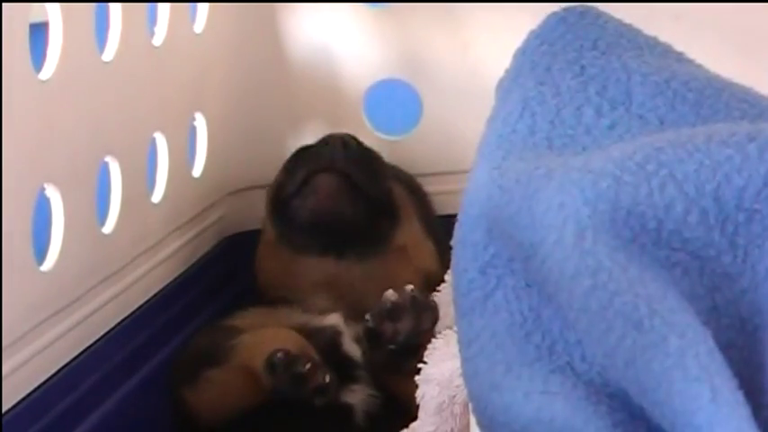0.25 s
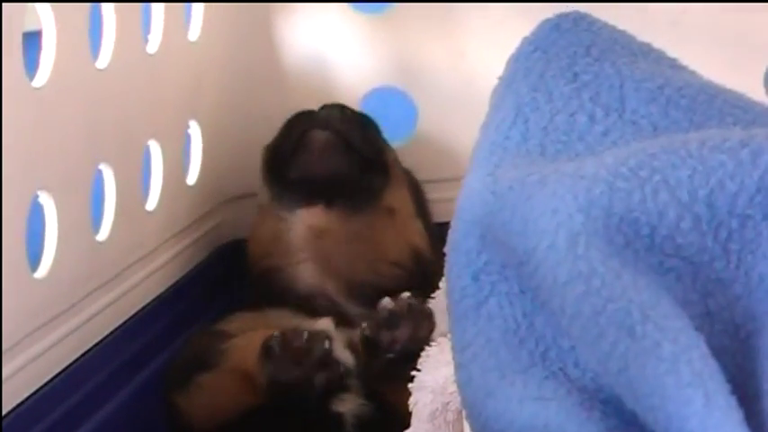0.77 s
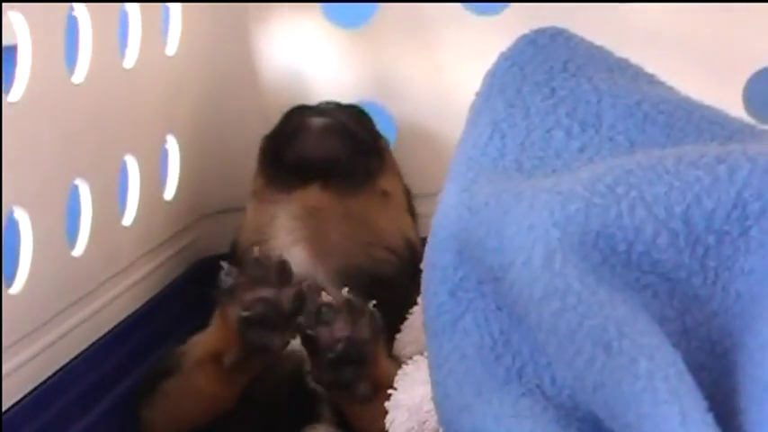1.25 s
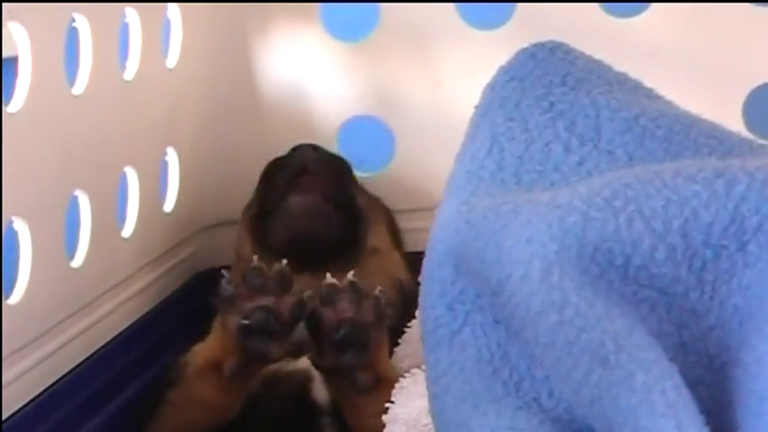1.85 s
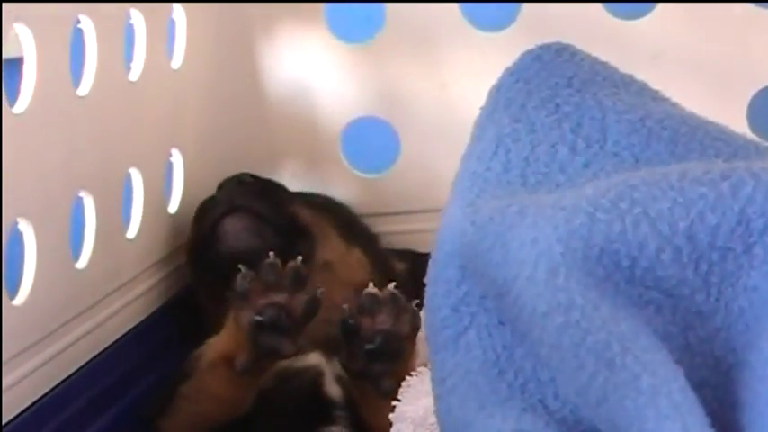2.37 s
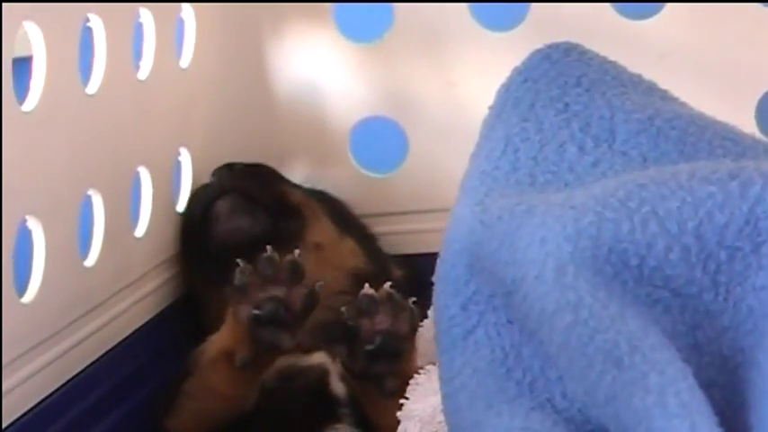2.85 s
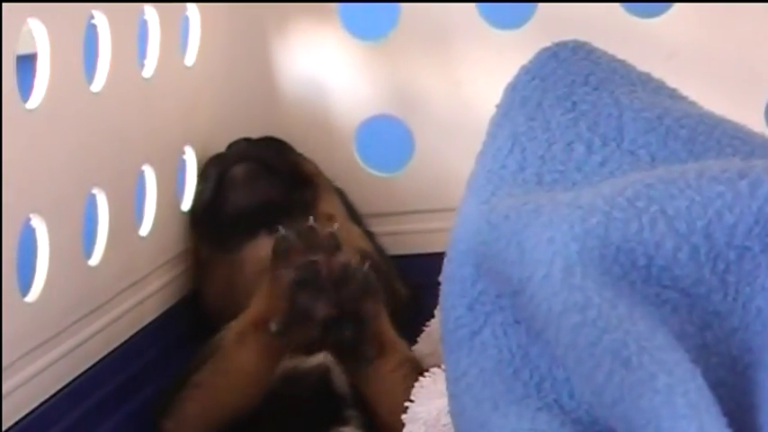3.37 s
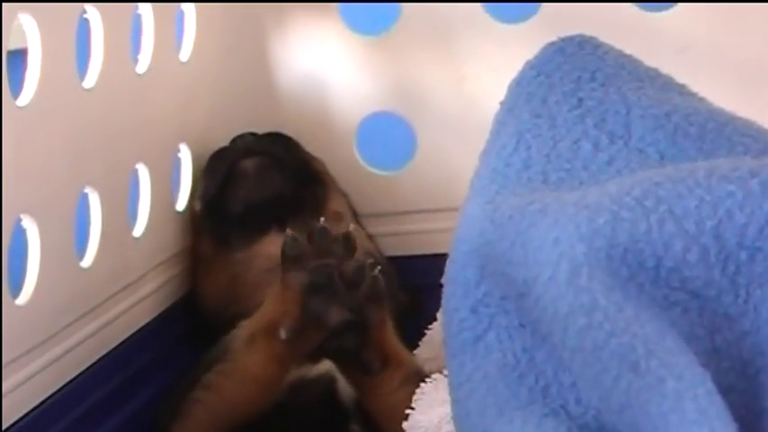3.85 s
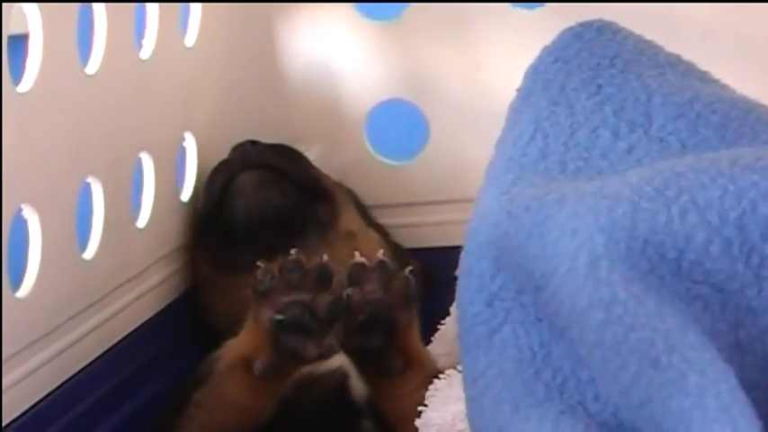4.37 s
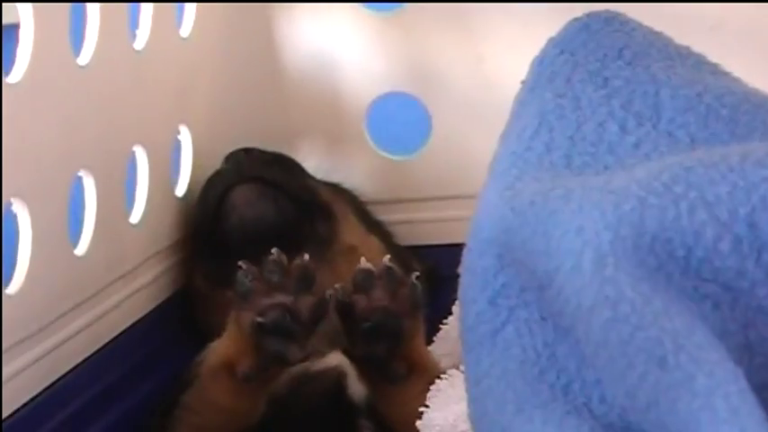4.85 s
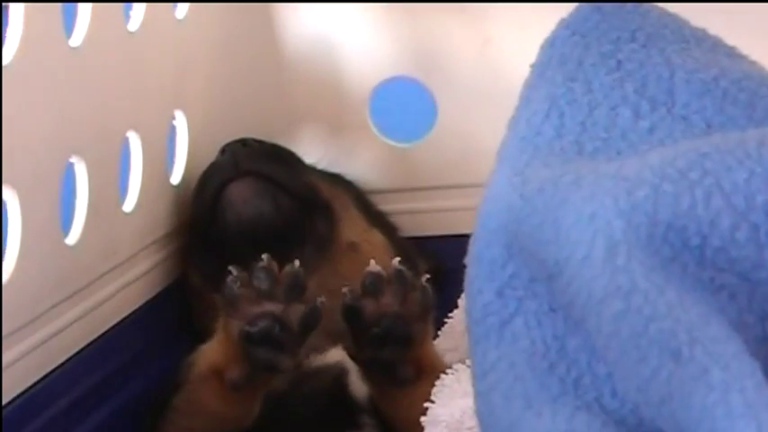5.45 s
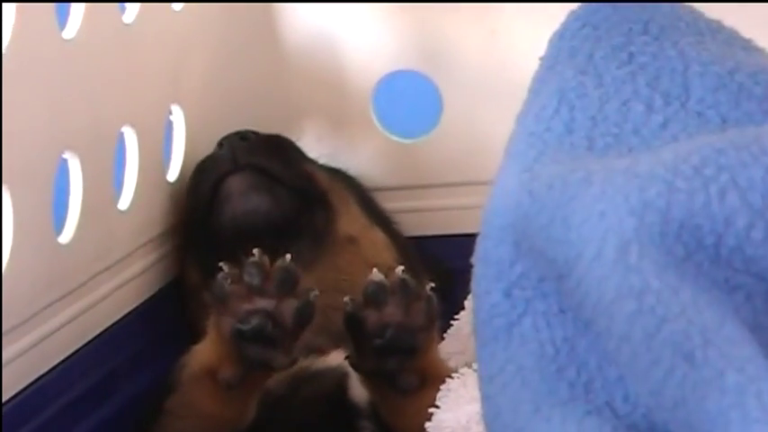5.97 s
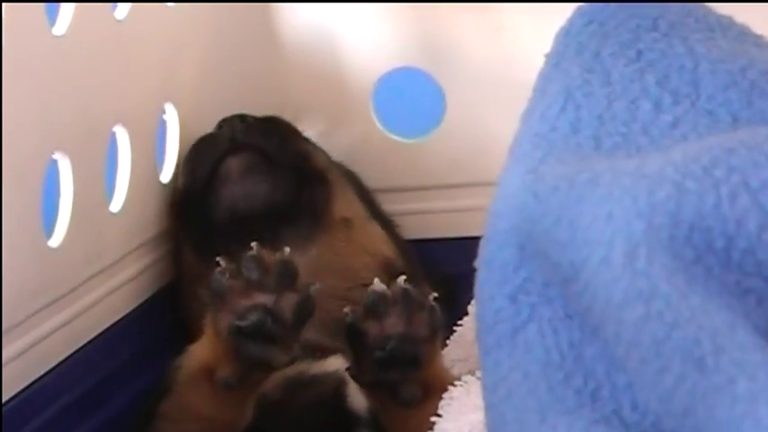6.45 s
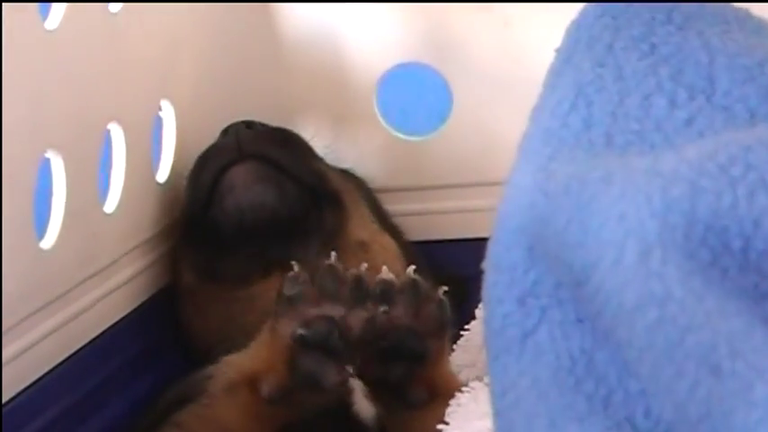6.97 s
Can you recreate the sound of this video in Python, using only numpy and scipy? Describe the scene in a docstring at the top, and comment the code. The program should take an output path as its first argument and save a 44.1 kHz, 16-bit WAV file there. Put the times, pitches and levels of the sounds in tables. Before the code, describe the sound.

Close, nasal puppy cries creak open, rise into high wavering whines and sink, shortening to quick yelps over faint room hum and hiss.

```python
"""In a quiet room, a very young puppy cries in its sleep in a plastic laundry basket, close to a camera.
Its cries start with a creak, and most rise to a thin whine and sink again; a high nasal ring rides along.
The voice is a stack of overtones shaped by throat, muzzle and nose, with rough noise mixed in.
Lips tick and fur brushes the bedding (short bursts of noise); an appliance hums (steady tones)
behind the camera's own faint whistle and a bed of room noise."""
import sys
import numpy as np
from scipy import signal
from scipy.fft import rfft, irfft, next_fast_len
from scipy.io import wavfile
from scipy.ndimage import uniform_filter1d, map_coordinates

SR = 44100
rng = np.random.default_rng(int(sys.argv[2]) if len(sys.argv) > 2 else 0)


def generate_wav(signal):
    """Clip the signal to [-1, 1] and save it as 16-bit WAV at the path in sys.argv[1]."""
    frames = np.transpose(np.atleast_2d(signal))
    scaled = np.clip(frames, -1, 1) * 32767
    pcm = np.round(scaled).astype(np.int16)
    wavfile.write(sys.argv[1], SR, pcm)


N = 317520

# colour given by throat, muzzle and basket: (frequency [Hz], level [dB])
THROAT = [(350, -20), (900, 2), (1250, 0), (1850, 0), (2150, -19), (2400, -26), (2560, -30.5),
          (3050, -24.5), (3900, -36.5), (4650, -36.5), (5700, -54), (7050, -23), (7950, -25.5), (9300, -62),
          (11000, -48), (14000, -82.5)]
# colour of air leaving the nose: (frequency [Hz], relative level [dB per Hz])
NOSE_AIR = [(5000, -41.5), (6200, -16.5), (7100, 8.5), (8000, -3.5), (9400, -27), (11000, -11.5),
            (11900, -9.5), (13000, -28), (15500, -38)]
NASAL_HZ = 5600  # overtones above this leave through the nose
TOP_HZ = 15700  # upper limit of the sound


def puppy():
    """The cries, one after another, and the small noises of mouth and nose."""
    # pitch of the vocal folds, one curve per cry: (time [s], pitch [Hz])
    pitch_curves = [
        [(0.07, 358.7), (0.108, 500), (0.2, 678.4), (0.226, 613), (0.24, 702), (0.254, 997)],
        [(0.392, 422.6), (0.404, 513.6), (0.416, 572), (0.424, 628), (0.436, 658), (0.46, 877), (0.506, 1014),
         (0.586, 1172), (0.644, 1254), (0.88, 1302), (1.03, 1351), (1.304, 1224), (1.69, 1140), (1.808, 1186),
         (1.832, 1167), (1.855, 1230)],
        [(2.575, 585), (2.585, 604), (2.625, 841.3), (2.685, 877.6), (2.735, 1015), (2.9, 1081), (3.115, 1108),
         (3.19, 1177), (3.35, 1229), (3.45, 1209), (3.7, 1188), (3.82, 1092), (3.882, 948), (3.93, 708),
         (4.02, 465.2), (4.049, 379)],
        [(4.893, 388.5), (4.94, 688.5), (5.035, 768), (5.088, 820), (5.138, 785.5), (5.161, 683),
         (5.245, 705.6), (5.326, 515)],
        [(5.588, 898), (5.65, 1047), (5.674, 910.4), (5.714, 1072), (5.758, 915), (5.81, 1017), (5.852, 933.5),
         (5.906, 908.6), (5.976, 819)],
        [(6.156, 666), (6.168, 653), (6.244, 943), (6.28, 909), (6.358, 1078), (6.496, 1163), (6.602, 1066),
         (6.654, 941.5), (6.698, 652.4), (6.768, 501), (6.786, 368)],
    ]
    # loudness, one curve per cry: (time [s], level of the voice [dB], level of its nasal ring [dB])
    loudness_curves = [
        [(0.07, -35, -68), (0.08, -31, -58), (0.1, -31, -56.5), (0.228, -28, -54.5), (0.254, -29.5, -84)],
        [(0.392, -25, -61), (0.4, -30.5, -58.5), (0.432, -26.5, -49), (0.496, -19.5, -48),
         (0.506, -19.5, -52.5), (0.578, -24.5, -46), (0.7, -18, -49.5), (0.798, -18, -47), (1.026, -8.5, -41.5),
         (1.124, -11, -42.5), (1.292, -8, -51), (1.316, -13, -51), (1.426, -14.5, -51.5), (1.454, -13.5, -55.5),
         (1.65, -21, -58.5), (1.76, -23, -63), (1.816, -24, -50.5), (1.855, -37.5, -66)],
        [(2.575, -27.5, -47), (2.591, -24.5, -40.5), (2.627, -17, -42), (2.841, -19.5, -41.5),
         (2.887, -19, -41), (3.067, -15.5, -45), (3.153, -16, -45), (3.433, -16, -34.5), (3.711, -13, -37.5),
         (3.757, -15.5, -40), (3.781, -12, -40.5), (3.823, -11.5, -49), (3.851, -13.5, -44), (3.995, -21, -48),
         (4.049, -30.5, -59)],
        [(4.893, -38.5, -53), (4.925, -32.5, -52), (5.093, -22, -45.5), (5.195, -26, -47), (5.261, -28, -52),
         (5.277, -25.5, -44), (5.315, -29, -53), (5.326, -43, -63)],
        [(5.588, -32, -51), (5.6, -27.5, -55.5), (5.636, -25.5, -43.5), (5.68, -20, -44), (5.71, -26, -41.5),
         (5.752, -19, -41.5), (5.8, -22.5, -42), (5.896, -19, -44.5), (5.942, -22, -47), (5.968, -27, -48),
         (5.976, -24, -49)],
        [(6.156, -39.5, -65), (6.188, -35.5, -51.5), (6.206, -28.5, -58.5), (6.242, -19.5, -44.5),
         (6.374, -22, -41.5), (6.406, -18.5, -45), (6.494, -23, -48.5), (6.544, -17.5, -47),
         (6.648, -18.5, -46.5), (6.718, -20.5, -41.5), (6.774, -29.5, -53.5), (6.786, -31.5, -62)],
    ]
    # how each cry is voiced: (opening creak [0-1], closing creak [0-1], hoarseness [0-1],
    # pressing at the start [dB], pressing at the end [dB],
    # fall from one low overtone to the next [dB], mouth opening [dB])
    voicings = [(0.3, 0.5, 0.07, -1, -4.5, 6.5, -1), (0.5, 0.5, 0.08, -3.5, 2, 7, -4.5),
                (.35, .5, .06, 2, 0, 1.5, -3), (.8, .25, .06, -2, 3, -1.5, 0.5),
                (.3, .6, .09, 6.5, -2, -1, -4.5), (.4, .4, .06, 1, 1, 0.5, -5.5)]
    # the head in each cry: (time the jaw takes to drop [s], muzzle resonance when open [Hz],
    # at the end [Hz], its boost [dB], nostril resonance [Hz], its boost [dB])
    heads = [(.06, 7600, 5200, 22, 9450, 26), (0.11, 3850, 4950, 19.5, 11100, 13.5),
             (.07, 3490, 2890, 13.5, 10000, 6.5), (0.026, 4600, 4520, 18.5, 11400, 14),
             (0.063, 4470, 4760, 23, 18000, -5), (.27, 3200, 2950, 15.5, 11400, 6)]
    voice = np.zeros(N)
    for melody, loudness, voicing, head in zip(pitch_curves, loudness_curves, voicings, heads):
        add(voice, loudness[0][0], cry(melody, loudness, voicing, head))
    return voice + lip_ticks() + toneless_creak() + sniff()


def cry(melody, loudness, voicing, head, throb_db=3, shimmer_rate=280, sway_db=0.34,
        air_db=-47, rasp_db=-14, nasal_air_db=-21, nasal_rasp_db=4,
        muzzle_air_db=-50, nostril_air_db=-20, attack_s=0.0064, release_s=.003):
    """Overtones of the vocal folds glide through resonances; roughness shakes them and lets air through."""
    # a second, weak vibration of the folds:
    # (start [s], end [s], multiple of the pitch, level relative to the voice [dB])
    side_tones = [(3.246, 3.914, 1.5, -40.5), (5.582, 5.627, 1.5, -10.5), (5.81, 5.96, 1.5, -37),
                  (6.32, 6.636, .68, -28), (6.341, 6.63, .54, -34)]
    swell_db_per_octave = 19  # the voice swells on the crests of a quaver, as pitch passes its melody
    creak, end_creak, hoarseness = voicing[:3]
    nostril_hz, nostril_db = head[4:]
    t = np.arange(round(loudness[0][0] * SR), round(loudness[-1][0] * SR)) / SR
    pitch, phase, rough, slip = folds(t, melody, creak, end_creak, hoarseness)
    level_db, ring_db = curves(loudness, t)
    level_db = level_db + swell_db_per_octave * np.log2(pitch / curves(melody, t)[0])
    muzzle_hz, muzzle_db = muzzle(t, pitch, head)
    k = np.arange(1, 31)[:, None]  # overtone numbers; 1 is the pitch itself
    hz = k * pitch
    balance_db = overtone_balance(t, k, pitch, rough, ring_db - level_db, voicing)
    peak_db = (muzzle_db / (1 + ((hz - muzzle_hz) / 270) ** 2)
               + nostril_db / (1 + ((hz - nostril_hz) / 500) ** 2))
    gain = amp(along(THROAT, hz) + balance_db + peak_db) * (hz < TOP_HZ)
    waves = np.sin(k * phase + rng.uniform(0, 2 * np.pi, k.shape))

    def stack(gains):
        """Overtones added up and held to an even loudness."""
        return np.sqrt(2) * (gains * waves).sum(0) / np.sqrt((gains ** 2).sum(0) + 1e-20)

    # the highest overtones leave through the nose, at a level of their own
    nasal = np.clip((hz - NASAL_HZ) / 400 + .5, 0, 1)
    # air escapes in one puff per cycle and whistles faintly in the muzzle
    puffs = 1 + .5 * np.cos(phase)
    mouth_air = unit(filtered(noise(THROAT, len(t)) * puffs, lambda f: f < NASAL_HZ))
    whistle = wobble(610, t) * np.sin(2 * np.pi * np.cumsum(muzzle_hz) / SR) * np.sqrt(rough)
    mouth = stack(gain * (1 - nasal))
    mouth = mouth + (amp(air_db) + amp(rasp_db) * rough) * mouth_air
    mouth = mouth + amp(muzzle_air_db + muzzle_db) * whistle
    for start, end, multiple, db in side_tones:
        mouth = mouth + amp(db) * arch(t, start, end) * np.sqrt(2) * np.sin(multiple * phase)

    hiss = amp(nasal_air_db) + amp(nasal_rasp_db) * rough
    nose = (stack(gain * nasal) + hiss * puffs * noise(NOSE_AIR, len(t))) / np.hypot(1, hiss)
    # the nostrils add a narrow band of hiss
    nostril_hiss = np.sqrt(rough) * wobble(1300, t) * np.sin(2 * np.pi * nostril_hz * t)
    nose = nose + amp(nostril_air_db + nostril_db) * nostril_hiss

    gate = np.clip(np.minimum((t - t[0]) / attack_s, (t[-1] - t) / release_s), 0, 1)
    shimmer = (1 + rough * np.tanh(wobble(shimmer_rate, t))) / np.hypot(1, rough)
    tremble = amp(sway_db * wobble(35.1, t) + throb_db * slip) * shimmer
    return gate * tremble * (amp(level_db) * mouth + amp(ring_db) * nose)


def folds(t, melody, creak, end_creak, hoarseness, jitter_rate=280, flutter_rate=66,
          waver=0.0041, wander=0.0022):
    """Pitch, phase, roughness and slip of the vocal folds, whose uneven swing makes a cry hoarse."""
    # the pitch quavers: (start [s], end [s], rate [Hz], depth [share of the pitch])
    quavers = [(0.467, .565, 28, 0.024), (0.633, .8, 19, .014), (2.719, 2.83, 17, 0.021),
               (4.948, 5.063, 25.6, .07), (5.089, 5.14, 50, .025), (6.343, 6.473, 19, .012)]
    # the voice trembles: (start [s], end [s], slip of the folds [radians], added roughness [0-1])
    flutters = [(.52, 0.908, .05, 0.06), (1.578, 1.76, 0.24, 0.1), (1.72, 1.851, 0.58, 0.13),
                (2.733, 3.04, 0.1, 0.03), (4.958, 5.16, 0.052, .06), (5.24, 5.34, 0.086, .07),
                (5.69, 5.721, 0.12, .2), (5.742, 5.958, .1, .04), (6.14, 6.2, .2, .35),
                (6.24, 6.36, .08, .06), (6.525, 6.77, .1, 0.04)]
    # the folds creak as they start and stop, and their hoarseness clears as a cry goes on
    creak_in_s, creak_out_s, clearing_s = 0.024, 0.022, .35
    age, remaining = t - t[0], t[-1] - t
    pitch = uniform_filter1d(curves(melody, t)[0], size=500, mode="nearest")
    pitch = pitch * (1 + waver * wobble(55, t) + wander * wobble(16, t))
    for start, end, rate_hz, depth in quavers:
        during = (t > start) * (t < end)
        pitch = pitch * (1 + depth * during * np.sin(2 * np.pi * rate_hz * (t - start)))
    hoarse = creak * np.exp(-age / creak_in_s) + end_creak * np.exp(-remaining / creak_out_s)
    hoarse = hoarse + hoarseness * np.exp(-age / clearing_s)
    # trembling folds slip and catch again in a quick, uneven beat
    beat = 2 * np.pi * flutter_rate * t + wobble(45, t)
    slip = 0
    for start, end, radians, added_roughness in flutters:
        slip = slip + radians * arch(t, start, end)
        hoarse = hoarse + added_roughness * arch(t, start, end)
    slip = slip * (np.sin(beat) + np.sin(2 * beat) / 3)
    rough = np.clip(hoarse, 0, 1) * np.abs(1 + 0.34 * np.cos(beat))
    phase = 2 * np.pi * np.cumsum(pitch) / SR + rough * wobble(jitter_rate, t) - slip
    return pitch, phase, rough, slip


def muzzle(t, pitch, head):
    """Pitch and boost of the muzzle's narrow resonance, which moves as the jaw drops."""
    jaw_s, open_hz, end_hz, boost_db = head[:4]
    closed_hz = 5580  # where the resonance starts, with the jaw closed
    thin_from_hz, thin_span_hz = 1018, 450  # the thinnest, highest whine damps it away
    hz = open_hz + (closed_hz - open_hz) * np.exp(-(t - t[0]) / jaw_s)
    hz = hz + (end_hz - open_hz) * np.linspace(0, 1, len(t)) ** 2
    return hz, boost_db * (1 - rise(pitch, thin_from_hz, thin_span_hz))


def overtone_balance(t, k, pitch, rough, ring_over_voice_db, voicing, ragged_db=11, drift_db=1.5):
    """Pressing the folds lifts the low overtones [dB], an open mouth the higher ones."""
    first_press_db, last_press_db, rolloff_db, opening_db = voicing[3:]
    # a higher cry is pressed harder
    slack_hz, press_db_per_octave = 550, 5.5
    # a voice that rings more in the nose is brighter all over: dB gained per dB above the usual ring
    usual_ring_db, press_per_ring, open_per_ring = -21, .15, .7
    bright_db = ring_over_voice_db - usual_ring_db
    press_db = first_press_db + (last_press_db - first_press_db) * np.linspace(0, 1, len(t))
    press_db = press_db + press_db_per_octave * np.log2(pitch / slack_hz) + press_per_ring * bright_db
    open_db = opening_db + open_per_ring * bright_db
    upper = np.clip((k * pitch - 2100) / 400, 0, 1) * (k > 2)
    # each upper overtone also drifts on its own
    drift = np.array([wobble(25, t) for _ in k])
    low_db = press_db - rolloff_db * (k - 2)
    balance_db = (k > 1) * ((1 - upper) * low_db + upper * (open_db + drift_db * drift))
    # hoarseness makes the upper overtones ragged
    ragged = np.array([wobble(130, t) for _ in k])
    return balance_db + upper * ragged_db * np.sqrt(np.minimum(rough, .2)) * ragged


def lip_ticks(t60_s=0.041, trim_db=-2, rise_s=0.0006):
    """Lips and tongue part with a tick: a burst of noise that starts fast and dies away."""
    # (time [s], level before the trim and the fade [dB])
    ticks = [(0.057, -36.5), (0.387, -34), (1.839, -27.5), (2.574, -27), (4.053, -28), (5.575, -27.5),
             (7.002, -42.5), (7.078, -48.5)]
    track, t = np.zeros(N), np.arange(SR // 20) / SR
    for s, db in ticks:
        envelope = amp(db + trim_db - 60 * t / t60_s) * (1 - np.exp(-t / rise_s))
        add(track, s, envelope * noise(THROAT, len(t)))
    return track


def toneless_creak(rate_hz=100, depth_db=6):
    """As the next cry gathers, slack folds let the air out in slow, uneven pops."""
    # one row: (start [s], rise time [s], level [dB])
    creak_onset = (7.145, .012, -43)
    # (frequency [Hz], relative level [dB per Hz])
    creak_colour = [(300, -18), (750, 1.5), (1100, -8), (1400, -13.5), (2000, -6), (2700, -32), (8000, -32),
                    (14000, -53.5)]
    start, rise_s, db = creak_onset
    t = np.arange(N) / SR
    pops = amp(depth_db * np.cos(2 * np.pi * rate_hz * t + wobble(39, t)))
    return amp(db) * rise(t, start, rise_s) * unit(pops * noise(creak_colour, N))


def sniff():
    """Air rushes softly through the nose before that creak, and keeps on to the end."""
    # one row: (start [s], rise time [s], level [dB])
    sniff_onset = (7.02, .04, -65)
    start, rise_s, db = sniff_onset
    return amp(db) * rise(np.arange(N) / SR, start, rise_s) * noise(NOSE_AIR, N)


def bedding(grain_db=1.0, rise_s=.02):
    """Fur catches and slips on the fleece as the puppy shifts; each stir rises quickly and dies away."""
    # (start [s], fading time [s], peak level [dB])
    stirs = [(0.981, 0.07, -48), (1.999, 0.096, -52), (2.163, .08, -53), (2.268, .13, -45),
             (4.09, 0.07, -53.5)]
    # colour of the rubbing: (frequency [Hz], relative level [dB per Hz])
    fur_colour = [(240, -32), (400, -5.5), (539, -8), (704, -18), (793, -5), (1220, -12.5), (1960, -9),
                  (7280, -21), (14000, -50.5)]
    t = np.arange(N) / SR
    rubbing = np.zeros(N)
    for s, fade_s, db in stirs:
        fade = np.exp(-np.maximum(t - s - rise_s, 0) / fade_s)
        rubbing += amp(db) * rise(t, s, rise_s) * fade
    return rubbing * unit(noise(fur_colour, N) * amp(grain_db * wobble(130, t)))


def basket(x):
    """The basket's standing waves give each microphone port (left, right) its own level and phase."""
    # (frequency [Hz], left level over right [dB])
    lean = [(400, -2.5), (700, -2.5), (1060, -4.5), (1160, -1), (1250, 1), (1420, 0), (1600, 2), (2200, 0),
            (2500, 3), (3300, -1.5), (6000, 0), (6600, -6), (7450, 7), (8300, -0.5), (11000, -9)]
    # (frequency [Hz], how far left leads right [radians])
    lead = [(400, 0.09), (760, -0.54), (1180, 0.68), (1380, 0.091), (1520, 0.3), (1800, -0.097),
            (2800, -.25), (5600, .05), (6500, .5), (7200, 1.1), (7650, -0.84), (9000, -1.2), (10800, .3)]

    def port_response(hz):
        half = amp(along(lean, hz) / 2) * np.exp(.5j * along(lead, hz))
        pair = np.array([half, 1 / half])
        return pair / np.abs(pair.mean(0))
    return filtered(x, port_response)


def room(x):
    """The room's echo: a short, soft tail of fading noise, with its own fading time at each frequency."""
    # (frequency [Hz], time to fall by 60 dB [s])
    walls = [(300, 0.19), (1500, 0.24), (10000, 0.085)]
    hz, t, z = signal.stft(rng.standard_normal((2, SR // 2)), SR, nperseg=256)
    fade = amp(-60 * t / along(walls, hz)[:, None])
    tail = signal.istft(z * fade, SR, nperseg=256)[1]
    return signal.fftconvolve(x[None], tail / np.linalg.norm(tail[0]), axes=1)[:, :N]


def background(floor_db=-49, unsteady=.3):
    """Room rumble and microphone hiss are wide noise; hum and whistle are slightly unsteady tones."""
    # colour of rumble and hiss: (frequency [Hz], relative level [dB per Hz])
    floor_colour = [(15, -51), (25, -29), (55, -11), (78, -15.5), (110, -10.5), (175, -13), (225, -19),
                    (380, -18.5), (450, -23), (900, -26.5), (3170, -39.5), (6200, -47), (10000, -52),
                    (15500, -61.5)]
    # appliance hum and camera whistle:
    # (frequency [Hz], rms level before the left-right balance [dB], left leads right by [radians])
    hum_lines = [(101.8, -54, 0.5), (193, -56.5, 1), (254.6, -64.5, 1), (377.7, -63.5, 0), (5950, -70, -2)]
    # likeness of the noise in the two ports: (frequency [Hz], left-right likeness [-1 to 1])
    alike = [(60, 0.95), (150, 1), (300, 0.66), (1000, 0.067), (8000, 0.78)]
    t = np.arange(N) / SR
    ports = np.array([[1], [-1]])  # left, right

    def turn(hz):
        return np.arccos(np.clip(along(alike, hz), -1, 1)) / 2

    # the ports share the mid noise and hear the side noise with opposite signs
    mid = filtered(noise(floor_colour, N), lambda hz: np.cos(turn(hz)))
    side = filtered(noise(floor_colour, N), lambda hz: np.sin(turn(hz)))
    hum = np.zeros((2, N))
    for hz, db, lead in hum_lines:
        phase = 2 * np.pi * hz * t + ports * lead / 2 + unsteady * wobble(8.1, t)
        hum += amp(db) * np.sqrt(2) * np.sin(phase)
    # left is 1 dB softer, right 1 dB louder
    return (amp(floor_db) * (mid + ports * side) + hum) * amp(-ports)


def amp(db):
    """Decibels to gain."""
    return 10 ** (np.asarray(db) / 20)


def unit(x):
    """Scaled to rms 1."""
    return x / np.sqrt(np.mean(x ** 2) + 1e-20)


def along(points, hz):
    """Reads a curve of (Hz, value) points on a log frequency axis."""
    f, v = np.transpose(points)
    return np.interp(np.log(hz + 1), np.log(f + 1), v)


def curves(rows, t):
    """Each column after the time, at the times t."""
    s, *cols = np.transpose(rows)
    return [np.interp(t, s, c) for c in cols]


def wobble(rate, t):
    """A smooth random curve, with rate knots a second."""
    at = (t - t[0]) * rate
    return map_coordinates(rng.standard_normal(int(at[-1]) + 4), [at + 1])


def rise(t, start, length):
    """A straight fade-in from 0 to 1."""
    return np.clip((t - start) / length, 0, 1)


def arch(t, start, end):
    """A rounded swell from 0 to 1 and back."""
    return np.sqrt(np.clip(4 * (t - start) * (end - t) / (end - start) ** 2, 0, 1))


def filtered(x, response):
    """Weighs each frequency of x by a response."""
    size = x.shape[-1]
    m = next_fast_len(size + SR // 4)
    return irfft(rfft(x, m) * response(np.fft.rfftfreq(m, 1 / SR)), m)[..., :size]


def noise(spectrum, size):
    """Noise of rms 1 with a (Hz, dB) spectrum."""
    return unit(filtered(rng.standard_normal(size), lambda hz: amp(along(spectrum, hz))))


def add(track, s, sound):
    """Mixes a sound in at time s [s]."""
    part = track[max(round(s * SR), 0):][:len(sound)]
    part += sound[:len(part)]


def scene():
    """The puppy in its basket, its soft echo, and the background."""
    near = puppy() + bedding()
    return basket(near) + amp(-15.5) * room(near) + background()


def record(dry):
    """The camera keeps nothing above its band limit."""
    return filtered(dry, lambda hz: hz < TOP_HZ)


dry = scene()
out = record(dry)
generate_wav(out)
```